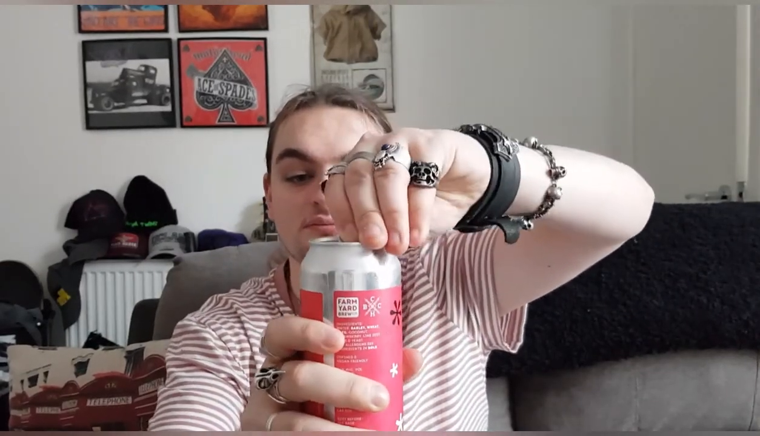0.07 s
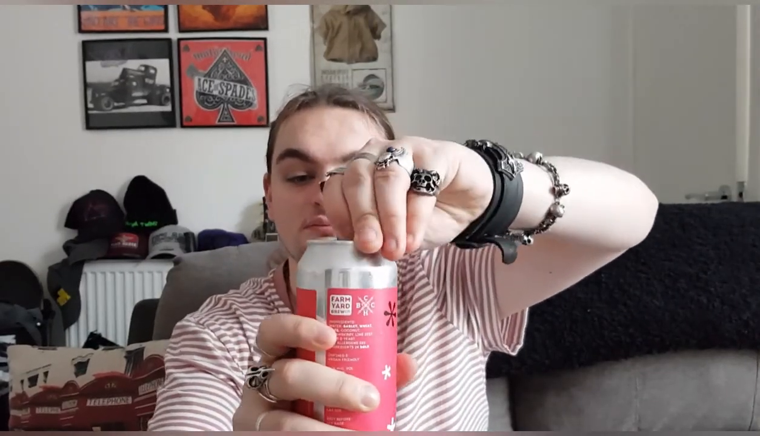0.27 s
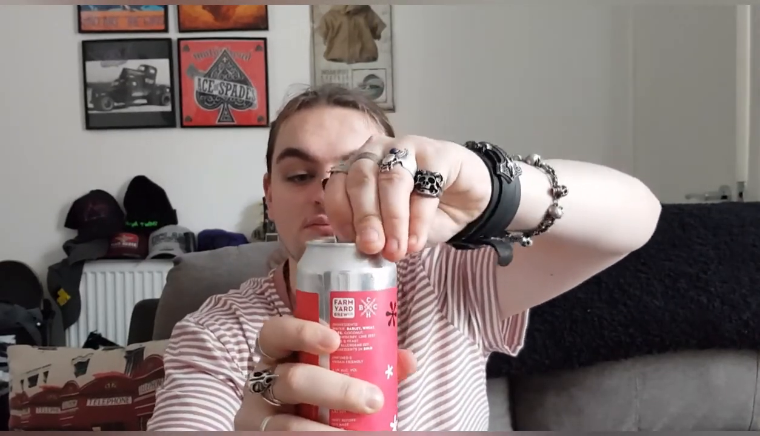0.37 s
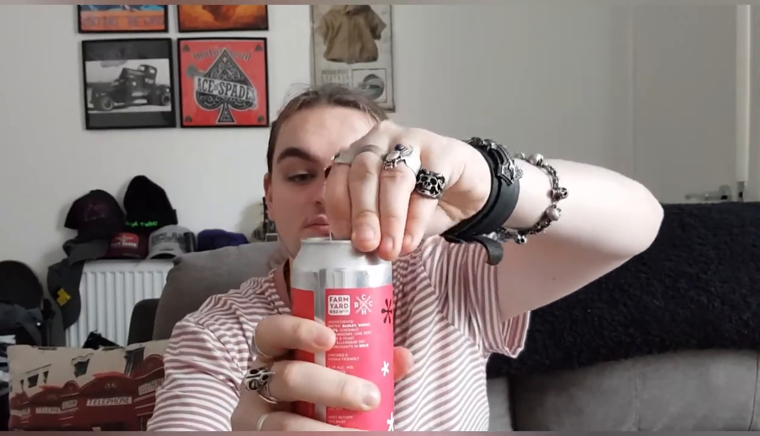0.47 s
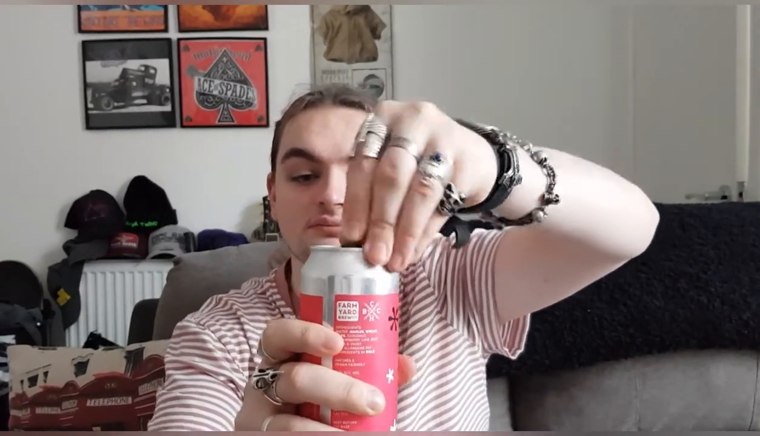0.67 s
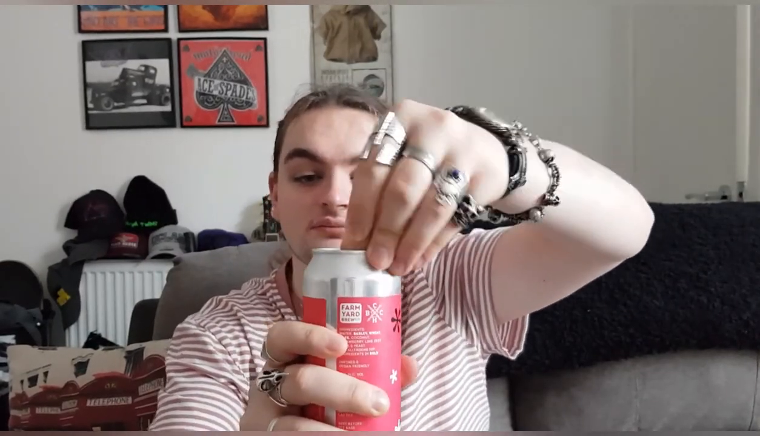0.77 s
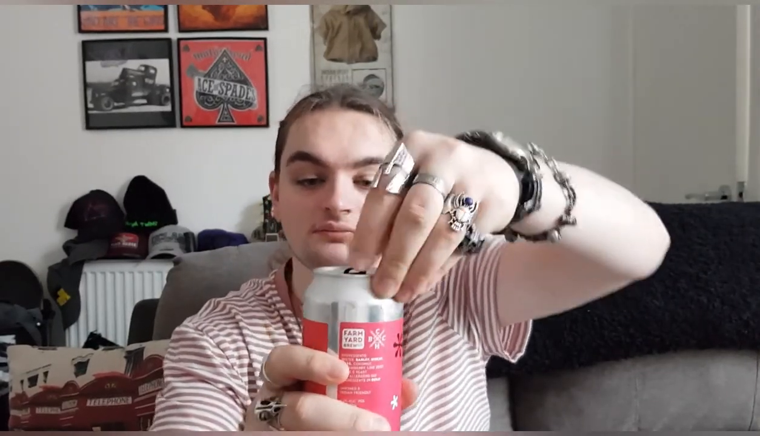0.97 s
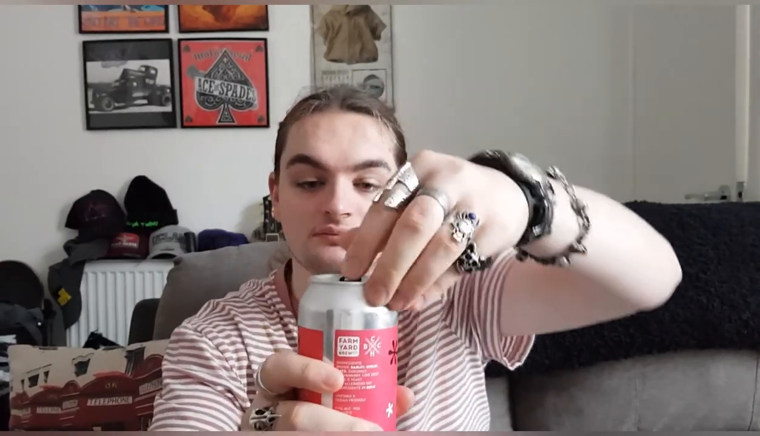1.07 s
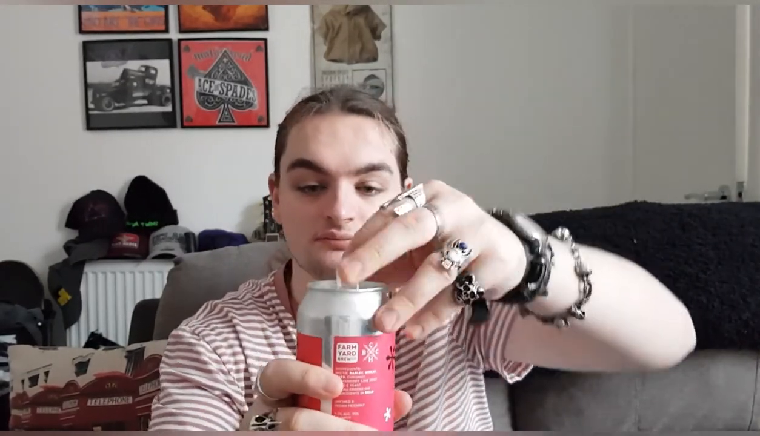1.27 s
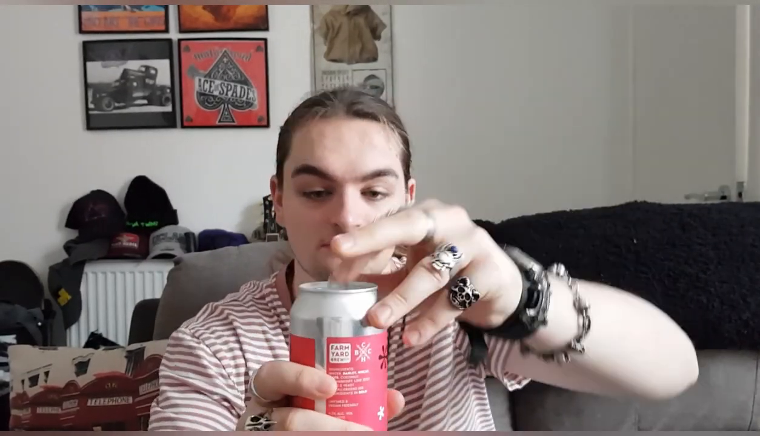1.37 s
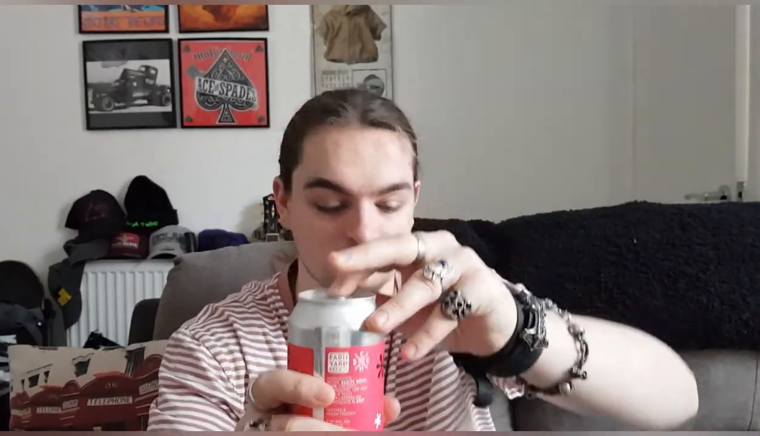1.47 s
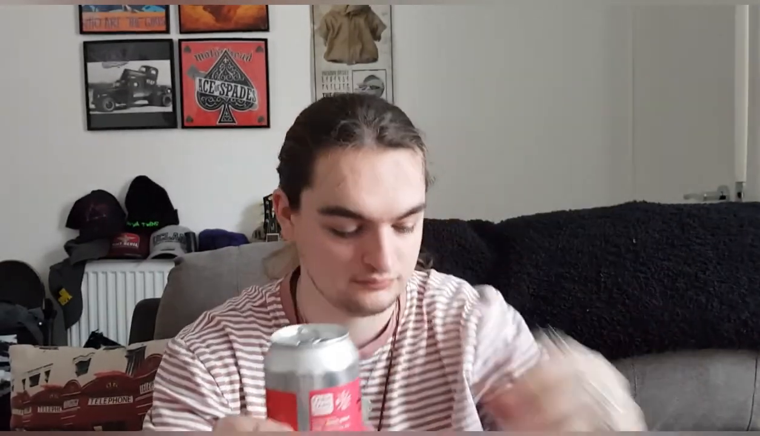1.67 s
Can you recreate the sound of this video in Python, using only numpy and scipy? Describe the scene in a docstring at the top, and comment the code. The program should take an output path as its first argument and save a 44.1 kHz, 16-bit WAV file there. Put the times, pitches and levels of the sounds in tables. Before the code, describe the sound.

Close to a phone in a small room, a can's lid ticks and bursts with a bright metallic crack and short fizz; a hollow knock and small clicks follow over faint hum.

```python
"""Drinks can opened close to a phone

An aluminium can, close to the phone's stereo microphone in a small living room with a faint hum.
Sharp ticks of the lid, built from snaps of noise, surround the burst; gas spits out as sputtering noise.
The scored panel bursts in with a crack and a hollow pop, a coloured snap over decaying modes.
Fingers then work the tab back: light knocks and slides stir the air and metal modes of the open can.
A decaying noise reply from the walls answers each sound."""
import sys
import numpy as np
from scipy import signal
from scipy.fft import rfft, irfft
from scipy.io import wavfile
from scipy.ndimage import uniform_filter1d

SR = 44100
rng = np.random.default_rng(int(sys.argv[2]) if len(sys.argv) > 2 else 0)


def transcribe(signal):
    """Save signal, clipped to [-1, 1], as a 16-bit WAV file at the path in sys.argv[1]."""
    frames = np.atleast_2d(signal).T
    limited = np.clip(frames, -1, 1)
    pcm = np.round(limited * 32767).astype(np.int16)
    wavfile.write(sys.argv[1], SR, pcm)


N = 74970
T = np.arange(N) / SR
CLICK_N, RING_N = 2048, 24576  # lengths of a click and of a ring [samples]
TAIL = np.arange(RING_N) / SR
SIDES = np.array([[1], [-1]])  # left, right
CRACK_S = .2178  # moment the panel bursts in [s]


def undb(db):
    """Decibels to gain."""
    return 10 ** (np.asarray(db) / 20)


def unit(x):
    """Scale to unit energy."""
    return x / np.sqrt(np.sum(x ** 2, axis=-1, keepdims=True))


def along(hz, points, axis=1):
    """Read a table's column on a log-frequency axis."""
    points = np.array(points, float)
    return np.interp(np.log(hz + 1), np.log(points[:, 0]), points[:, axis])


def through(x, response):
    """Pass a sound through an impulse response."""
    return signal.fftconvolve(x, response)[:len(x)]


def causal(gain):
    """Minimum-phase click with the given gain at each frequency, made by folding the cepstrum."""
    cepstrum = irfft(np.log(gain + 1e-9))
    cepstrum[len(cepstrum) // 2:] = 0
    cepstrum[1:] *= 2
    return irfft(np.exp(rfft(cepstrum)))


def colour(points):
    """Unit-energy click with the spectrum of a (frequency [Hz], relative level [dB]) table."""
    hz = np.fft.rfftfreq(CLICK_N, 1 / SR)
    return unit(causal(undb(along(hz, points))))


def fade(t60):
    """Exponential decay by 60 dB in t60 seconds."""
    return np.exp(-np.log(1000) * TAIL / max(t60, 1e-4))


def ring(modes):
    """Struck modes, each a decaying sine; little sounds below the lowest of them."""
    x = 0
    for hz, db, t60 in modes:
        x = x + undb(db) * unit(np.sin(2 * np.pi * hz * TAIL) * fade(t60))
    highpass = signal.butter(4, 0.74 * modes[0][0], "high", fs=SR)
    return unit(signal.lfilter(*highpass, x + 1e-18))


def at(start, x):
    """Delay a sound to its moment."""
    silence = np.zeros(int(round(start * SR)))
    return np.concatenate([silence, x, np.zeros(N)])[:N]


def pair(likeness):
    """Left and right noise that are partly alike."""
    mid, side = rng.standard_normal((2, N))
    c = np.clip(likeness, -1, 1)
    return (np.sqrt(1 + c) * mid + np.sqrt(1 - c) * side * SIDES) / np.sqrt(2)


def even(x):
    """Level out the broad humps in the spectrum of a noise burst."""
    width_hz = 70
    power = uniform_filter1d(np.abs(rfft(x)) ** 2, size=int(width_hz * len(x) / SR))
    return unit(through(x, causal(1 / np.sqrt(np.abs(power) + 1e-9))))


def snap():
    """One sudden give of the metal and the short shiver of the thin sheet after it."""
    shiver_db, shiver_t60_s = 4.5, .006
    x = undb(shiver_db) * unit(rng.standard_normal(CLICK_N) * fade(shiver_t60_s)[:CLICK_N])
    x[0] += 1
    return unit(x)


# room tone and microphone hiss: (frequency [Hz], relative level [dB])
HISS_COLOUR = [(25, -13), (46, 0.5), (70, -7), (130, -13), (300, -20), (600, -23), (1200, -27),
               (2500, -35.5), (5000, -35), (8500, -41.5), (12000, -25.5), (16000, -27.5)]
# steady hum of the place: (frequency [Hz], level before the offset between the sides [dB])
HUM_TONES = [(45.5, -71.5), (183, -86), (228, -85.5), (318, -83.5), (549, -90.5), (640, -87.5),
             (1140, -88.5)]


def room_tone():
    """Low household hum of steady sines, and faint coloured noise nearly alike on both sides."""
    hiss_db, likeness = -69.5, 0.93
    hum = 0
    for hz, db in HUM_TONES:
        hum = hum + undb(db) * np.sqrt(2) * np.sin(2 * np.pi * (hz * T + rng.random()))
    gain = undb(along(np.fft.rfftfreq(N, 1 / SR), HISS_COLOUR))
    hiss = irfft(rfft(pair(likeness)) * gain, N)
    hum_sides = undb(np.array([[2.5], [-3.5]]))
    return undb(hiss_db) * hiss / hiss.std() + hum * hum_sides


# reverberation of the room: (band centre [Hz], t60 [s], level over the direct sound [dB])
ROOM_BANDS = [(193, .33, -11), (798, 0.28, 2), (2048, 0.29, 3.5), (4000, 0.33, 3), (6975, 0.29, 0.5),
              (14000, 0.25, 4)]
# balance at the microphone: (frequency [Hz], left minus right [dB])
EAR_BALANCE = [(500, -4.5), (1000, 0.3), (2000, -0.5), (4000, -2), (8000, 3.5), (14000, 1)]


def room():
    """Direct sound, scatter from hands and phone, then the walls' decaying reply, alike in the bass."""
    wall_gap_s = .004
    scatter_db, scatter_t60_s = -7.5, 0.003
    likeness = [(500, 1.0), (1000, 0.17), (2000, 0.1)]  # left with right (frequency [Hz], correlation)
    hz = np.fft.rfftfreq(RING_N, 1 / SR)
    late = TAIL > wall_gap_s

    mean_t60 = np.mean([t60 for _, t60, _ in ROOM_BANDS])
    mid = rfft(even(rng.standard_normal(RING_N) * fade(mean_t60) * late))
    side = rfft(even(rng.standard_normal(RING_N) * fade(mean_t60) * late))
    c = np.clip(along(hz, likeness), -1, 1)
    walls = np.sqrt((1 + c) / 2) * mid + np.sqrt((1 - c) / 2) * side * SIDES

    response = 0
    for k, (_, t60, db) in enumerate(ROOM_BANDS):
        # crossfade to the neighbouring bands, then correct the decay to this band's own
        band = along(hz, [(row[0], j == k) for j, row in enumerate(ROOM_BANDS)])
        decay = fade(t60) / fade(mean_t60) * late * (TAIL < .5)
        response = response + undb(db) * irfft(walls * band) * decay

    burst = rng.standard_normal(RING_N) * fade(scatter_t60_s)
    scatter = through(burst, colour([(400, -16.5), (2000, 1)]))
    response = response + undb(scatter_db) * unit(scatter) * SIDES
    response[:, 0] += 1  # direct sound
    balance_db = along(hz, EAR_BALANCE)
    return [through(ear, causal(undb(balance_db * sign / 2))) for ear, sign in zip(response, SIDES)]


# knocks of tab and fingers on the opened can:
# (time [s], hollow ring level [dB], metal ring level [dB], click level [dB], treble gain [dB])
TAB_KNOCKS = [(0.5404, -41, -48.5, -46.5, 5.5), (0.6456, -30.5, -41, -46, 2.5),
              (0.7481, -40.5, -54, -51, 10), (0.9149, -12, -36.5, -26.5, -17), (.994, -38, -50, -44, -11),
              (1.1962, -44, -38.5, -40.5, 4), (1.2016, -27, -29, -20, -1.5), (1.2023, -22, -25, -23.5, 0),
              (1.3882, -26.5, -37, -21, -1.5), (1.4951, -48, -45, -42, -17)]
# fingers sliding over tab and lid:
# (middle [s], half length [s], hollow ring level [dB], rustle level [dB])
FINGER_SLIDES = [(0.64, 0.014, -35.5, -43.5), (0.668, 0.0058, -56, -41), (1.6, .04, -61, -45)]
# air modes of the opened can: (frequency [Hz], relative level [dB], t60 [s])
AIR_MODES = [(990, -3.5, .11), (1059, -5, .06), (1115, -6, 0.034), (1175, -3.5, 0.16), (1214, -16.5, 0.1)]
# metal modes of the opened can: (frequency [Hz], relative level [dB], t60 [s])
CAN_MODES = [(1726, 3.5, 0.053), (1934, 3.5, 0.044), (2194, 5, 0.057), (2607, -16, .05), (2916, -2, 0.087),
             (3510, -21, 0.09), (4420, -6, 0.039), (5070, 2.5, 0.032), (5390, -3.5, 0.052), (6000, -6, .05),
             (6246, 6.5, .08)]
# colour of a knock's click: (frequency [Hz], relative level [dB])
KNOCK_COLOUR = [(100, -49), (500, -25.5), (750, -17), (1000, -0.5), (1500, -5), (2800, 2), (4800, -1.5),
                (6600, -1.5), (8200, -14), (9600, -12.5), (12000, -15.5), (16000, -26)]
# colour of a sliding finger: (frequency [Hz], relative level [dB])
SLIDE_COLOUR = [(300, -35), (1200, -14), (1900, 3), (2700, -18), (5400, -7), (8500, -24), (16000, -20)]


def handling():
    """Knocks and slides ring the air of the open can; knocks also ring its metal."""
    treble_hz = 3210  # the treble gain acts above this; soft contacts lose what lies there
    push_s = .002  # time a knock takes to stir the air inside
    push = np.sin(np.pi * np.minimum(TAIL / push_s, 1)) * np.sin(2 * np.pi * AIR_MODES[2][0] * TAIL)
    hollow = unit(through(push, ring(AIR_MODES)))
    hz = np.fft.rfftfreq(CLICK_N, 1 / SR)
    air = metal = click = rustle = 0

    for s, hollow_db, metal_db, click_db, treble_db in TAB_KNOCKS:
        treble = causal(undb(treble_db / (1 + (treble_hz / (hz + 1)) ** 16)))
        contact = at(s, through(snap(), treble))
        air = air + at(s, [undb(hollow_db)])
        metal = metal + undb(metal_db) * contact
        click = click + undb(click_db) * contact

    for s, half, hollow_db, rustle_db in FINGER_SLIDES:
        swell = np.exp(-np.minimum(((T - s) / half) ** 2, 20))
        grains = unit(rng.laplace(size=N) * swell)
        air = air + undb(hollow_db) * grains
        rustle = rustle + undb(rustle_db) * grains

    rings = through(air, hollow) + through(metal, ring(CAN_MODES))
    return rings + through(click, colour(KNOCK_COLOUR)) + through(rustle, colour(SLIDE_COLOUR))


# colour of the escaping gas: (frequency [Hz], relative level [dB])
JET_COLOUR = [(100, -44.5), (400, -26.5), (900, -15.5), (2200, -10), (4000, 6), (6500, -2), (8500, -12.5),
              (11500, -4), (16000, -20.5)]


def gas():
    """A sputtering jet of noise grows as the slit widens and dies once the lid is open."""
    start_s, rise_db = .188, 21
    fade_s = 0.014  # time constant
    jet_db, rough_db = -29, 6
    opening = np.clip((T - start_s) / (CRACK_S - start_s), 0, 1)
    dying = np.exp(-np.maximum(T - CRACK_S, 0) / fade_s)
    flow = (T > start_s) * undb(rise_db * (opening - 1)) * dying
    sputter = uniform_filter1d(rng.standard_normal(N), size=50)
    roughness = undb(rough_db * sputter / sputter.std())
    jet = flow * roughness * rng.standard_normal(N)
    return undb(jet_db) * through(jet, colour(JET_COLOUR))


# sharp ticks of the lid before and just after it bursts, and one faint late click:
# (time [s], level [dB])
LID_TICKS = [(.1755, -43), (.1877, -19), (0.1895, -14), (.1938, -19.5), (.2008, -22.5), (0.2014, -16),
             (0.2051, -2.5), (0.2115, -14), (0.2227, -4.5), (0.227, -5.5), (0.5447, -35)]
# colour of a tick: (frequency [Hz], relative level [dB])
LID_TICK_COLOUR = [(100, -52), (400, -35.5), (1000, -34), (1600, -15), (2500, -17.5), (3400, 2.5),
                   (4800, -2.5), (6200, 0.5), (8500, -19.5), (11500, -10.5), (16000, -22.5)]
# colour of the crack: (frequency [Hz], relative level [dB])
BURST_COLOUR = [(50, -38), (220, -30), (400, -15.5), (700, -8.5), (1150, 0.5), (1600, 0), (2200, -7.5),
                (3500, -2), (4700, -2), (5800, 0.5), (6800, -9.5), (8500, -16), (11500, -16), (16000, -26)]
# modes of the lid under pressure: (frequency [Hz], relative level [dB], t60 [s])
TIGHT_LID_MODES = [(1593, -13.5, .2), (2484, -4.5, 0.18), (3356, -2, 0.15), (3660, 0.5, 0.28),
                   (3700, -5, .36), (3940, -4, 0.13), (4240, -2, .25), (5060, -4, .15), (5500, -8, .3),
                   (5516, -6, .25), (5670, -9, .12), (5865, 0, .12)]
# hollow ring of the gas space as the panel bursts in:
# (frequency [Hz], relative level [dB], t60 [s])
GAS_SPACE_MODES = [(698, -13, 0.012), (841, 8, 0.029), (830, -12, 0.5), (856, -13.5, .3),
                   (969, -4.5, 0.068), (1070, -15, 0.23)]


def lid():
    """The lid ticks around its burst, which is a crack, the lid's ring and the pop of the gas space."""
    crack_db, lid_db, pop_db = 5.5, -6, 5
    tick_ring_db = -19  # lid ring stirred by the ticks
    ticks = sum(undb(db) * at(s, snap()) for s, db in LID_TICKS)
    metal = ring(TIGHT_LID_MODES)
    ticking = through(ticks, colour(LID_TICK_COLOUR)) + undb(tick_ring_db) * through(ticks, metal)
    crack = undb(crack_db) * through(snap(), colour(BURST_COLOUR))
    ringing = undb(lid_db) * metal + undb(pop_db) * ring(GAS_SPACE_MODES)
    return ticking + at(CRACK_S, crack) + at(CRACK_S, ringing)


def scene():
    """The can heard through the room at both sides, over the room tone."""
    can = lid() + gas() + handling()
    return np.array([through(can, ear) for ear in room()]) + room_tone()


def record(dry):
    """The phone rounds off the loudest peaks and cuts the top."""
    top_hz = 15900
    rounded = .8 * np.tanh(dry / .8)
    lowpass = signal.ellip(10, .2, 80, top_hz, fs=SR, output="sos")
    return signal.sosfilt(lowpass, rounded)


dry = scene()
out = record(dry)
transcribe(out)
```